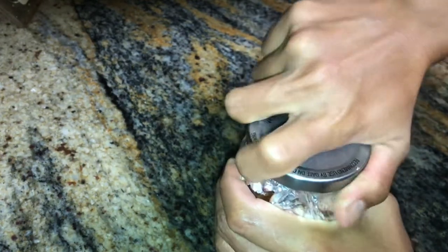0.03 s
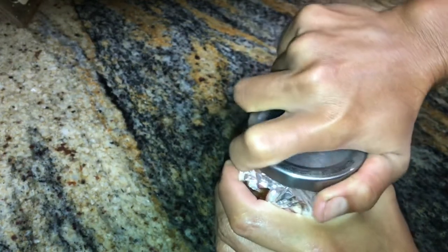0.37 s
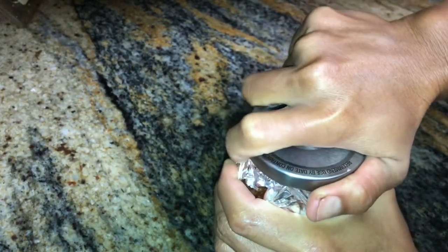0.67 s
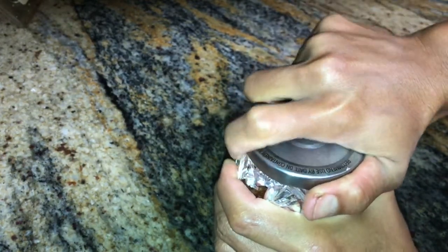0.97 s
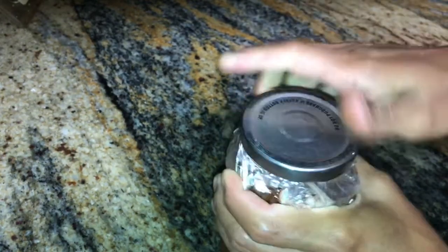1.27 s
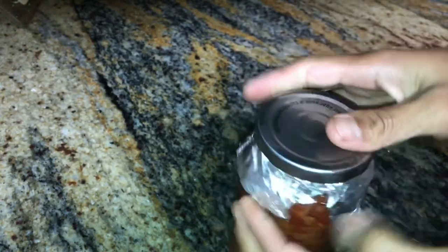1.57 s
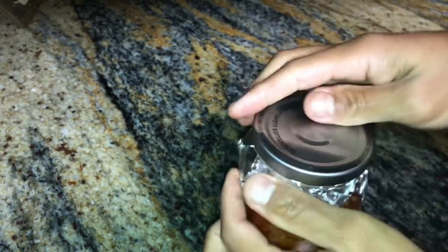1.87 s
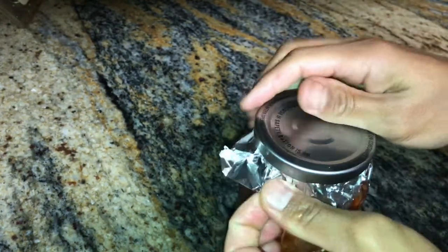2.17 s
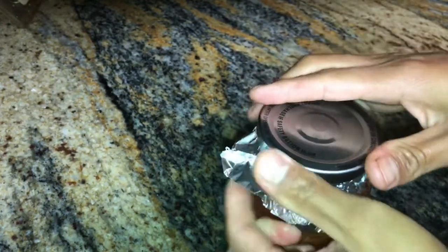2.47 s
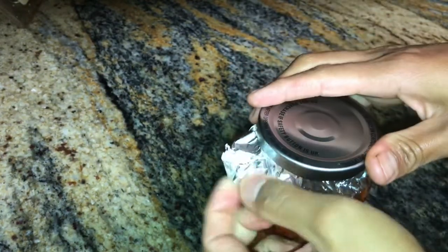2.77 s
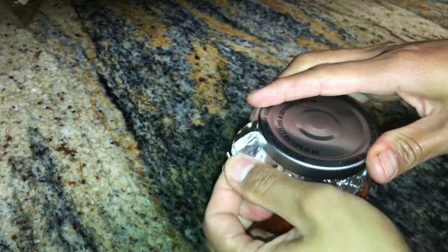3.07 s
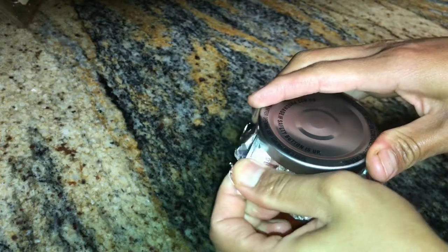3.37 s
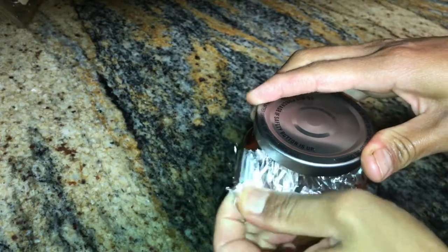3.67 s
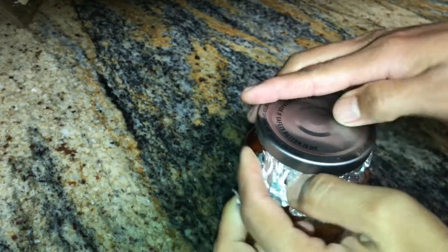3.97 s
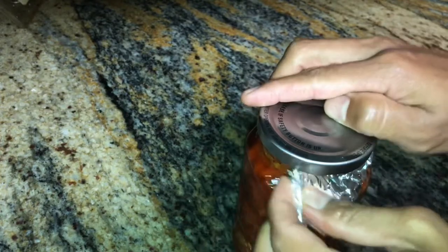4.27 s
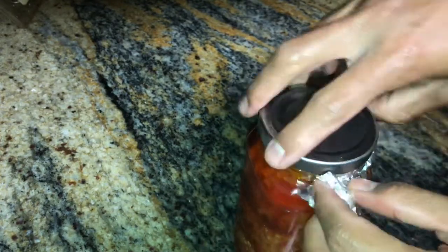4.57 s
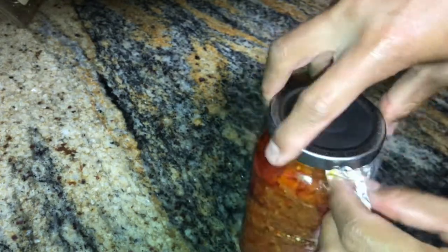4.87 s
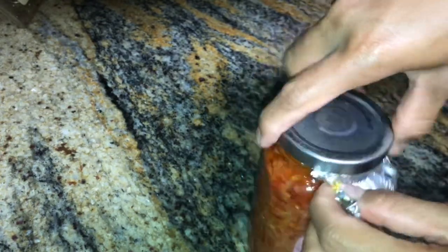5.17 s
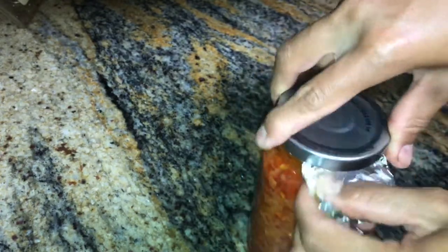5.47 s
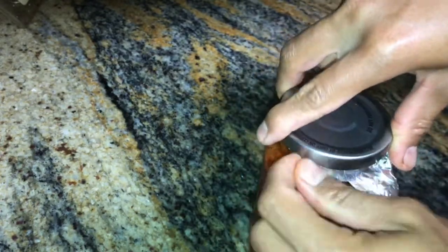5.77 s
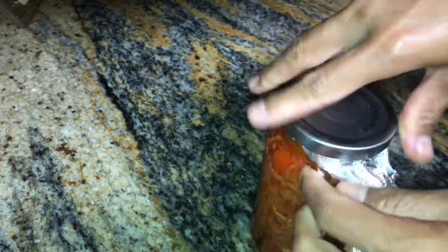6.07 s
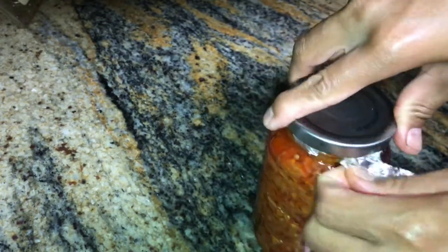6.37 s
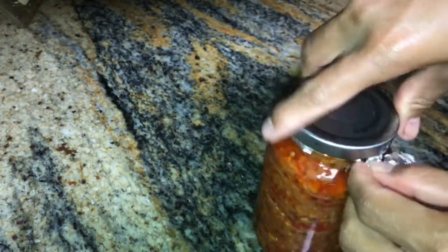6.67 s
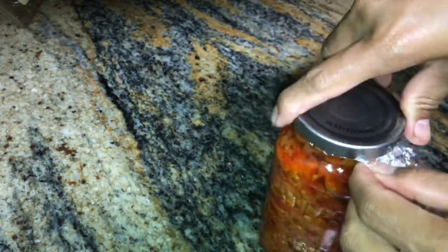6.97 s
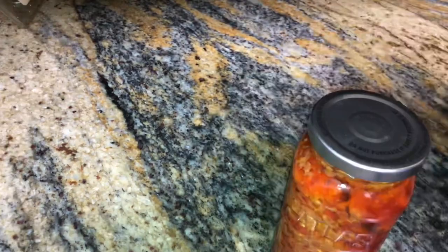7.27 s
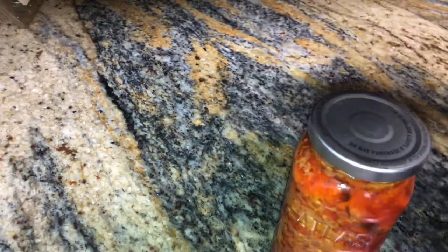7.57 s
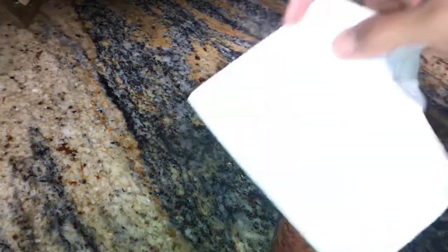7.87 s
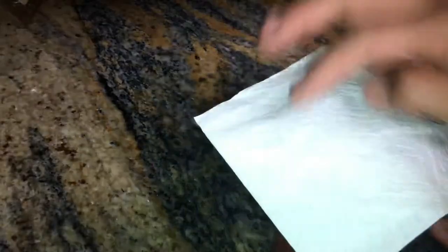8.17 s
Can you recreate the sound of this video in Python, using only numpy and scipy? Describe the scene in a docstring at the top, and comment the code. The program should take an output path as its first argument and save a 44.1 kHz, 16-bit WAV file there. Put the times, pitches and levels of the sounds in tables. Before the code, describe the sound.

For the first second, aluminium foil crackles lightly as a metal lid is twisted onto a full glass jar, with small ticks and a faint rumble of gripping hands. At about 1.2 seconds the jar knocks, then slides softly on a stone counter until nearly 2 seconds. Fingers pick at the foil, making bright, irregular crinkles and snaps that faintly ping the lid. These grow busier and are loudest from 3 to 3.5 seconds, with a few light knocks and scuffs. Around 4.3 seconds there is a very faint, brief low drone. From there until 7.2 seconds a foil strip is torn off in short crackling tugs, with a knock near 5.3 seconds and a tiny fingertip squeak near 7.1. A paper towel then rustles softly until about 8.4 seconds. Everything is quiet and close, over a low kitchen hum.

```python
"""A metal lid is screwed down over aluminium foil on a full glass jar, on a stone kitchen counter.
Fingers twist the lid and pick at the foil skirt: facets crackle, creases snap, the lid pings.
Knocks ring the jar; at 1.2 s it slides on the stone, and from 3 s it scuffs as the foil is pulled.
Between cuts at 4.3 and 7.2 s the room tone is thinner; the torn strip is tugged off along the rim,
a low drone sounds briefly and a fingertip squeaks off the lid. Then a paper towel is brought over."""
import sys
import numpy as np
from scipy import signal
from scipy.fft import rfft, irfft
from scipy.io import wavfile
from scipy.ndimage import uniform_filter1d

SR = 44100
rng = np.random.default_rng(int(sys.argv[2]) if len(sys.argv) > 2 else 0)


def wav_record(signal):
    """Record a signal, one row per channel, as 16-bit PCM in the file named by sys.argv[1]."""
    frames = np.transpose(np.atleast_2d(signal))
    bounded = np.clip(frames, -1, 1)
    # unit amplitude maps onto the largest positive 16-bit level
    quanta = np.round(bounded * 32767).astype(np.int16)
    wavfile.write(sys.argv[1], SR, quanta)


N = 366912
TIME = np.arange(N) / SR
# between two cuts, the room tone is thinner and the foil snaps start more softly
CUT_IN_S, CUT_OUT_S = 4.29, 7.21


def from_db(db):
    """Decibels to gain."""
    return 10 ** (np.asarray(db) / 20)


def rms_one(x):
    """Scale to rms 1."""
    return x / np.sqrt(np.mean(x ** 2) + 1e-20)


def band(x, low_hz, high_hz, order=2):
    """Causal band-pass."""
    sos = signal.butter(order, [low_hz, min(high_hz, .45 * SR)], "band", fs=SR, output="sos")
    return signal.sosfilt(sos, x + 1e-18)


def colour(x, spectrum):
    """Minimum-phase filter through (Hz, dB) points, so nothing sounds early."""
    hz, db = np.transpose(spectrum)
    bins_hz = np.fft.rfftfreq(N, 1 / SR)
    gain = from_db(np.interp(np.log(bins_hz + 1), np.log(hz), db))
    cepstrum = irfft(np.log(gain), N)
    fold = np.r_[1, 2 * np.ones(N // 2 - 1), np.zeros(N - N // 2)]
    return irfft(rfft(x) * np.exp(rfft(cepstrum * fold)), N)


def noise(spectrum):
    """Coloured noise of rms 1."""
    return rms_one(colour(rng.standard_normal(N), spectrum))


def drift(per_s):
    """Random line through per_s knots a second, rms 1."""
    knots_s = np.arange(0, TIME[-1] + 1, 1 / per_s)
    return rms_one(np.interp(TIME, knots_s, rng.standard_normal(N)[:len(knots_s)]))


def ring(x, hz, t60_s):
    """Decaying mode: a unit click rings a sine of height 1."""
    r, w = 1000 ** (-1 / (t60_s * SR)), 2 * np.pi * hz / SR
    return signal.lfilter([0, np.sin(w)], [1, -2 * r * np.cos(w), r * r], x + 1e-18)


def resonance(x, hz, width_hz):
    """Resonator with peak gain 1."""
    r, w = np.exp(-np.pi * width_hz / SR), 2 * np.pi * hz / SR
    return signal.lfilter(np.array([1, 0, -1]) * (1 - r * r) / 2, [1, -2 * r * np.cos(w), r * r], x + 1e-18)


def wavering_tone(hz, waver, per_s):
    """Sine of rms 1; its pitch wanders by the fraction waver."""
    pitch_hz = hz * (1 + waver * drift(per_s))
    return np.sqrt(2) * np.sin(2 * np.pi * np.cumsum(pitch_hz) / SR)


def strokes(rows, attack_s, release_s):
    """Gain of moves (start s, length s, dB) that swell, hold and fade; overlaps add in power."""
    start_s, length_s, db = np.transpose(rows)[:3, :, None]
    t = TIME[::40]
    fade = np.exp(np.minimum(t - start_s, 0) / attack_s - np.maximum(t - start_s - length_s, 0) / release_s)
    return np.interp(TIME, t, np.linalg.norm(from_db(db) * fade, axis=0))


def room_tone(full_db=-58.5, thin_db=-59, thin_hum_hz=245, thin_hum_db=-67):
    """Low noise and faint hum, thinner between the two cuts."""
    # Noise colours. Each row: frequency in Hz, relative density in dB.
    full_spectrum = [(15, -45), (25, 1), (134, -7), (175, -9.5), (405, -16), (489, -22.5), (796, -21),
                     (1230, -22.5), (2110, -31), (4140, -31), (4490, -42.5), (5880, -34.5), (6380, -30),
                     (7310, -39), (16000, -36.5)]
    thin_spectrum = [(40, -26), (60, -17), (80, 0.5), (160, 0.5), (240, -1.5), (330, -7.5), (500, -9),
                     (750, -14.5), (1200, -18.5), (2500, -22), (4000, -23), (16000, -32)]
    # Hum tones. Each row: frequency in Hz, level in dB.
    hums = [(73, -72), (121, -66.5)]
    full = from_db(full_db) * noise(full_spectrum)
    full += sum(from_db(db) * wavering_tone(hz, waver=.0198, per_s=20) for hz, db in hums)
    thin = from_db(thin_db) * noise(thin_spectrum)
    thin += from_db(thin_hum_db) * wavering_tone(thin_hum_hz, waver=.0198, per_s=20)
    thin_share = uniform_filter1d(1. * ((TIME > CUT_IN_S) & (TIME < CUT_OUT_S)), SR // 50)
    return (1 - thin_share) * full + thin_share * thin


def crackle(effort, base_per_s, clump_db, ring_db, hiss_db, spread_db=4.8, facet_count=30):
    """Tiny buckles come in avalanches, each ringing one facet; a harder pull merges them into hiss."""
    clumps = from_db(clump_db * drift(130))
    pull = np.clip(effort / from_db(-54), .5, 6)
    buckles = rng.random(N) < base_per_s * pull * clumps / SR
    sizes = from_db(spread_db * np.minimum(rng.exponential(1, N), 4))
    clicks = buckles * sizes * rng.choice([-1, 1], N)
    struck = rng.integers(0, facet_count, N)
    facets_hz = np.linspace(1700, 15500, facet_count)
    facets = sum(ring(clicks * (struck == k), hz, t60_s=.01) for k, hz in enumerate(facets_hz))
    hiss = rng.standard_normal(N) * clumps * pull
    grains = rms_one(clicks) + from_db(ring_db) * rms_one(facets) + from_db(hiss_db) * rms_one(hiss)
    return grains / np.sqrt(uniform_filter1d(grains ** 2, SR // 25) + 1e-9)   # levelled over 40 ms


def worked_foil(grains, spectrum, moves, attack_s, release_s, body_db, top_db, top_hz, wander_db=2):
    """Large facets give the crackle its body, small ones its top; each move has its own mix."""
    # Like-sized facets that come and go under the fingers. Each row: centre in Hz, width in Hz.
    facet_groups = [(3500, 900), (5600, 1300), (7800, 1500), (10000, 1800), (13200, 2500)]
    top_gain = strokes(moves, attack_s, release_s)
    body_moves = [(s, length_s, db + over_db) for s, length_s, db, over_db in moves]
    body_gain = strokes(body_moves, attack_s, release_s)
    sound = colour(grains, spectrum)
    for hz, width_hz in facet_groups:
        sound = sound + (from_db(wander_db * drift(12)) - 1) * resonance(sound, hz, width_hz)
    body = band(sound, 800, 6000, order=3)
    top = band(band(sound, 6000, 19000, order=3), 100, top_hz, order=1)
    return from_db(body_db) * body_gain * rms_one(body) + from_db(top_db) * top_gain * rms_one(top)


def foil_skirt(attack_s=.0081, release_s=.028):
    """Fingers press and pick at the whole skirt, which shakes the lid. Returns sound and effort."""
    # Each row: start in seconds, length in seconds, level in dB, body over top in dB.
    presses = [(0.004, 0.18, -55, -9), (0.282, 0.029, -57, 2.5), (0.438, 0.0056, -59.5, 3.5),
               (0.554, 0.017, -60, 3), (0.777, 0.044, -55, 0), (0.872, 0.032, -61.5, -1),
               (0.965, 0.12, -60, -5), (1.119, 0.057, -49, -8), (1.209, 0.11, -58, 0),
               (1.295, 0.034, -45, -1.5), (1.421, 0.0038, -47, -5.5), (1.7, 0.014, -58, 0),
               (1.794, 0.303, -47.5, -4.5), (2.155, 0.013, -50.5, -18), (2.241, 0.063, -43.5, -1),
               (2.335, 0.23, -56.5, 0), (2.43, 0.011, -51, -10), (2.594, 0.13, -49.5, -0.5),
               (2.66, 0.012, -43, -5), (2.878, 0.75, -54.5, 0.5), (2.951, 0.046, -49.5, 1.5),
               (3.045, 0.014, -43, -3), (3.403, 0.066, -39, 1), (3.577, 0.08, -40.5, -1.5),
               (3.834, 0.51, -51.5, -2.5), (4.113, 0.11, -48, -2)]
    # Crackle colour. Each row: frequency in Hz, gain in dB.
    spectrum = [(290, -69), (500, -15), (586, -14.5), (988, -14.5), (1620, -23), (1980, -12), (3250, -15.5),
                (3810, -11.5), (4530, -14), (6700, -3), (7750, -4), (8960, 0), (10500, -1.5), (14500, 5.5),
                (16000, -22)]
    effort = strokes(presses, attack_s, release_s)
    grains = crackle(effort, base_per_s=600, clump_db=3.6, ring_db=0, hiss_db=-.5)
    foil = worked_foil(grains, spectrum, presses, attack_s, release_s, body_db=1.5, top_db=.5, top_hz=11000)
    return foil + lid_ring(foil, gain_db=3), effort


def lid_ring(foil, gain_db, uneven_db=0, detune=0):
    """Foil clamped under the rim pings the lid; the place of pull and the hand shift its modes."""
    # Each row: frequency in Hz, gain in dB, t60 in seconds.
    modes = [(2210, -13, .03), (2620, -10, .03), (3060, -4, .04), (3430, 0, .055), (3720, -2, .04),
             (5270, -7, .035), (6850, -4, .04)]
    gains = from_db(gain_db + uneven_db * rng.standard_normal(len(modes)))
    shifts = 1 + detune * rng.standard_normal(len(modes))
    return sum(gain * from_db(db) * resonance(foil, hz * shift, np.log(1000) / (np.pi * t60_s))
               for gain, shift, (hz, db, t60_s) in zip(gains, shifts, modes))


def snap(t, rise_s, crack_s, facet_s, facet_db, lid_db, count=30, flip_db=-7):
    """One crack: the flipping facet gives it a pitch, its neighbours ring faintly, the lid pings."""
    after_s = np.maximum(t, 0)
    crack = rng.standard_normal(len(t)) * np.exp(np.minimum(t, 0) / rise_s - after_s / crack_s)
    hz = rng.uniform(3000, 15500, (count, 1))
    life_s = facet_s * rng.uniform(.5, 1.5, (count, 1))
    facets = rng.choice([-1, 1], (count, 1)) * np.sin(2 * np.pi * hz * after_s) * np.exp(-after_s / life_s)
    flip = facets[:3].sum(axis=0) * np.exp(-after_s / (2 * crack_s))   # the strongest modes die first
    sound = crack + from_db(flip_db) * flip + from_db(facet_db) * facets.sum(axis=0) * np.sqrt(2 / count)
    return sound + lid_ring(sound, lid_db, uneven_db=2, detune=.025)


def snaps(rows, soft_db=-.5, sheet_db=-7, sheet_hz=(1760, 3160), middle_db=2.5, middle_sag=.65):
    """Taut creases flip at once; between the two cuts the snaps start more softly."""
    # Body, middle and top of a snap. Each row: low edge in Hz, high edge in Hz.
    bands = [(2350, 4200), (4900, 9000), (9000, 16800)]
    lead, out = SR // 200, np.zeros(N + SR)
    t = np.arange(-lead, SR // 20) / SR
    for s, level_db, tilt_db in rows:
        if CUT_IN_S < s < CUT_OUT_S:
            sound = snap(t, rise_s=.0016, crack_s=.0019, facet_s=.003, facet_db=-13, lid_db=-20)
            level_db += soft_db
        else:
            ping_db = np.clip(-2 * tilt_db, -8, 6)   # deep snaps lie near the rim and shake the lid most
            sound = snap(t, rise_s=.00008, crack_s=.00044, facet_s=.0026, facet_db=-16, lid_db=ping_db)
        # body, middle, top, then the sheet flexing around the crease
        offsets_db = [-tilt_db, middle_db + middle_sag * min(tilt_db, 0), tilt_db, sheet_db - tilt_db]
        at = round(s * SR) - lead
        for (low_hz, high_hz), db in zip(bands + [sheet_hz], offsets_db):
            part = band(sound, low_hz, high_hz, order=3)
            out[at:at + len(t)] += from_db(level_db + db) * part * np.sqrt(lead / np.sum(part ** 2))
    return out[:N]


def large_creases():
    """The main creases snap as the foil is picked and torn."""
    # Each row: time in seconds, level in dB, tilt in dB per octave.
    creases = [(0.0157, -48.5, 8), (0.0569, -47, 3), (0.0914, -46.5, -1.5), (0.1171, -47, 3),
               (0.1339, -45, 2), (0.1433, -44.5, 6.5), (0.148, -55, -1), (0.2841, -50, 7.5),
               (0.3082, -46.5, 1), (0.5543, -47, 7), (0.663, -56, 1), (0.8633, -45, 0), (0.9577, -45, -3),
               (0.9652, -44.5, -3.5), (1.0287, -48, 7), (1.0398, -46, 1.5), (1.3336, -39, -1),
               (1.3928, -50, 2), (1.5022, -52.5, 5), (1.6964, -44, 4.5), (1.7031, -42, 2.5),
               (1.7805, -45.5, 7), (1.8182, -55, 18), (1.865, -53, 18), (1.9142, -45, 10),
               (1.9521, -42.5, 7.5), (2.0001, -48.5, 17), (2.0432, -44, -3), (2.0634, -35.5, 4.5),
               (2.0855, -38.5, -2.5), (2.1669, -34.5, -6), (2.1839, -36.5, 5), (2.2499, -42.5, 6.5),
               (2.2896, -37, 5.5), (2.4344, -44, 6), (2.4782, -52, 5), (2.5023, -40.5, 6),
               (2.5401, -45.5, 4), (2.5742, -60, 20), (2.6323, -35.5, 1.5), (2.6626, -33.5, -1.5),
               (2.6672, -32.5, -1), (2.6761, -42, 10), (2.9157, -41, 1.5), (2.9848, -32.5, 1.5),
               (3.0078, -49, -6), (3.0248, -36.5, -1), (3.0291, -31.5, 0), (3.0481, -39, 5),
               (3.0613, -28.5, 2), (3.0877, -35, 4.5), (3.1247, -33, -4), (3.163, -38.5, -8),
               (3.1918, -36, 9.5), (3.2458, -43, -9.5), (3.2535, -40.5, 7.5), (3.279, -48, 3),
               (3.2937, -32.5, -3), (3.3158, -34, 4), (3.3349, -35.5, 3.5), (3.3848, -38.5, 2.5),
               (3.4028, -27, -7), (3.4099, -23, -6.5), (3.433, -23.5, -5), (3.438, -29.5, -3.5),
               (3.6048, -36.5, -4), (3.6132, -42, 3), (4.0368, -47, 4.5), (4.1389, -39, 1),
               (4.1867, -40, 1.5), (4.3427, -42, 7), (4.501, -52.5, 14.5), (4.8715, -40, 7.5),
               (4.9398, -60, 12), (5.4459, -42.5, 5), (5.5759, -40.5, 6), (5.928, -38, -0.5),
               (5.9348, -39.5, 3), (5.9819, -43.5, 9), (6.0349, -37.5, 5), (6.1029, -41, 3.5),
               (6.285, -49, 2), (6.4016, -42, 0.5), (6.5822, -42.5, 6), (6.671, -52.5, 15.5),
               (6.9492, -56.5, 4), (7.1148, -50, 5)]
    return snaps(creases)


def small_creases(effort, runs=42, per_run=3, gap_s=.017, above_db=1, spread_db=5, limit_db=-46.5):
    """Small creases give way at random and set off their neighbours; strength follows the effort."""
    starts_s = rng.uniform(.02, CUT_OUT_S, (runs, 1))
    times_s = (starts_s + gap_s * rng.exponential(1, (runs, per_run)).cumsum(axis=1)).ravel()
    strength, dullness = rng.standard_normal((2, len(times_s)))
    effort_db = 20 * np.log10(np.interp(times_s, TIME, effort) + 1e-9)
    level_db = np.minimum(effort_db + above_db + spread_db * strength, limit_db)
    tilt_db = 3 - .5 * dullness
    return snaps(np.c_[times_s, level_db, tilt_db])


def grip_rumble():
    """The hands rumble at each twist of the lid."""
    # Each row: start in seconds, length in seconds, level in dB.
    twists = [(.24, 0.12, -55.5), (.48, .13, -54.5), (.79, 0.035, -50), (1.17, .05, -58)]
    # Each row: frequency in Hz, relative density in dB.
    spectrum = [(40, -36), (80, 11.5), (150, 8.5), (300, -0.5), (500, -14.5), (1000, -49)]
    return strokes(twists, attack_s=.1, release_s=.068) * noise(spectrum)


def knocks(tick_db=1):
    """A short push and a faint judder ring the jar; harder contacts are brighter and thinner."""
    # Contacts of hand, lid and jar. Each row: time in seconds, peak in dB, brightness in Hz.
    hits = [(0.305, -43, 1540), (.334, -49, 1210), (0.452, -38.5, 3900), (0.462, -47, 1990),
            (0.572, -39, 4000), (0.59, -45.5, 1490), (0.776, -41.5, 1230), (0.802, -43, 3020),
            (0.821, -44.5, 1960), (1.16, -26.5, 840), (1.167, -30.5, 830), (1.322, -33.5, 920),
            (1.334, -42, 1300), (2.016, -46.5, 1410), (2.086, -40, 3040), (2.291, -31.5, 3480),
            (3.410, -34.5, 3460), (3.60, -42, 4000), (5.267, -32, 2140), (5.272, -38, 2100)]
    # Full jar with lid. Each row: frequency in Hz, gain in dB, t60 in seconds.
    modes = [(191.7, -8, 0.049), (400, -2, 0.014), (505, -6.5, 0.051), (544, -10, 0.072), (794, -1, 0.018),
             (911, 3.5, 0.029), (1049, 5.5, 0.028), (1190, 4, 0.016), (1387, 0, 0.071), (1506, -4.5, 0.045),
             (1813, 1, 0.049), (2177, 10.5, 0.011), (2690, 2.5, 0.051)]
    t, out = np.arange(SR // 5) / SR, np.zeros(N + SR)
    judder = from_db(-13) * np.exp(-t / .0018) + from_db(-34) * np.exp(-t / .025)
    for s, peak_db, bright_hz in hits:
        push = band((t == 0) + judder * rng.standard_normal(len(t)), bright_hz / 7, bright_hz, order=3)
        body = sum(ring(push, hz, t60_s) * from_db(db + rng.standard_normal()) * (-1) ** k
                   for k, (hz, db, t60_s) in enumerate(modes))
        tick = from_db(tick_db) * np.clip(bright_hz / 4000, 0, 1) * push / np.abs(push).max()
        knock = body / np.abs(body).max() + tick
        at = round(s * SR)
        out[at:at + len(t)] += from_db(peak_db) * knock / np.abs(knock).max()
    return out[:N]


def jar_slide(rough_db=3):
    """Glass grinds softly over stone: a shove, then a longer draw."""
    # Each row: start in seconds, length in seconds, level in dB.
    moves = [(1.235, 0.019, -53.5), (1.36, 0.45, -60.5)]
    # Sliding jar. Each row: frequency in Hz, width in Hz, gain in dB.
    modes = [(516, 180, -12.5), (1024, 220, -8.5), (1230, 59, -6.5)]
    friction = rng.standard_normal(N) * from_db(rough_db * drift(110))
    body = sum(from_db(db) * resonance(friction, hz, width_hz) for hz, width_hz, db in modes)
    return strokes(moves, attack_s=.058, release_s=.095) * rms_one(band(body, 250, 1900))


def scuffs(rough_db=3):
    """Short swells of friction sound the hollow jar and grate in the lid."""
    # Each row: centre in seconds, half length in seconds, level in dB, grating over hollow in dB.
    rubs = [(3.033, 0.0041, -49, -12), (3.061, 0.0034, -42.5, -7), (3.864, 0.02, -61.5, 1),
            (4.648, 0.044, -59.5, 4), (5.033, 0.013, -57, -6), (5.131, 0.035, -66, 8),
            (5.285, 0.015, -52.5, 1.5), (6.666, 0.022, -63, 6), (6.725, 0.018, -55.5, 0),
            (7.108, 0.1, -69, 7.5)]
    # The hollow jar, then two lid resonances. Each row: frequency in Hz, width in Hz.
    modes = [(750, 200), (2050, 700), (2500, 600)]
    friction = rng.standard_normal(N) * from_db(rough_db * drift(200))
    hollow, *lid = [rms_one(resonance(resonance(friction, *mode), *mode)) for mode in modes]
    grating, out = rms_one(sum(lid)), np.zeros(N)
    for s, half_s, db, grate_db in rubs:
        swell = np.exp(-.5 * ((TIME - s) / half_s) ** 2)
        out += from_db(db) * swell * (hollow + from_db(grate_db) * grating)
    return out


def foil_strip(attack_s=.018, release_s=.026):
    """The torn strip is pulled off along the rim, tug by tug. Returns sound and effort."""
    # Each row: start in seconds, length in seconds, level in dB, body over top in dB.
    tugs = [(4.322, 0.014, -61, -24), (4.386, 0.053, -56.5, -7), (4.479, 0.077, -50.5, -10),
            (4.61, 0.11, -53, -9), (4.834, 0.1, -47, -7), (5, 0.16, -51, -5.5),
            (5.265, 0.0037, -48.5, -0.5), (5.322, 0.033, -56, -1.5), (5.438, 0.026, -38.5, -6.5),
            (5.494, 0.21, -47.5, -8.5), (5.814, 0.089, -49.5, -5.5), (5.915, 0.03, -42, -3.5),
            (6.03, 0.0064, -47, -4.5), (6.099, 0.14, -50, -6), (6.289, 0.036, -42.5, -8),
            (6.389, 0.022, -44, -9), (6.464, 0.25, -52, -7), (6.56, 0.031, -47, -22),
            (6.77, 0.036, -52, -1), (6.873, 0.027, -51, -8.5), (6.957, 0.017, -50.5, -6.5),
            (7.104, 0.017, -54, -2.5)]
    # Crackle colour. Each row: frequency in Hz, gain in dB.
    spectrum = [(290, -67), (500, 7.5), (640, -6), (795, -8), (1190, -9), (1770, -2.5), (2570, -2),
                (3250, -11.5), (4090, -2), (4660, -6.5), (6230, -7.5), (7640, 2), (9920, -7.5), (13400, 0),
                (16000, -10)]
    effort = strokes(tugs, attack_s, release_s)
    grains = crackle(effort, base_per_s=1100, clump_db=4, ring_db=.5, hiss_db=0)
    foil = worked_foil(grains, spectrum, tugs, attack_s, release_s, body_db=.5, top_db=2.5, top_hz=18900)
    return foil, effort


def drone(start_s=4.34, length_s=.12, level_db=-63):
    """A short low drone of narrow-band noise."""
    gain = strokes([(start_s, length_s, level_db)], attack_s=.04, release_s=.059)
    return gain * rms_one(resonance(rng.standard_normal(N), hz=310, width_hz=12))


def squeak():
    """A fingertip sticks and slips on the lid's lacquer at an unsteady pitch."""
    # Each row: start in seconds, length in seconds, level in dB.
    slips = [(7.125, .015, -62)]
    return strokes(slips, attack_s=.011, release_s=.037) * wavering_tone(hz=3040, waver=.0079, per_s=240)


def paper_towel(fibre_db=1.5, flutter_db=2.5):
    """Soft fibres catch and slip in a dense, dull rustle."""
    # Each row: start in seconds, length in seconds, level in dB.
    brushes = [(7.24, 0.415, -59.5), (7.24, 0.07, -58), (7.63, 0.028, -58.5), (7.77, 0.1, -62),
               (7.87, 0.021, -57), (8.225, 0.01, -49), (8.285, .035, -53.5)]
    # Each row: frequency in Hz, gain in dB.
    spectrum = [(290, -39.5), (500, -10), (1060, -9.5), (1600, -14), (1770, -9), (2850, -9.5), (4470, -11),
                (5090, -14.5), (5550, -14), (16000, -24)]
    fibres = rng.standard_normal(N) * from_db(fibre_db * drift(1500) + flutter_db * drift(60))
    return strokes(brushes, attack_s=.011, release_s=.024) * rms_one(colour(fibres, spectrum))


def kitchen(x, t60_s=.17, wet_db=-15, wall_hz=9000):
    """A short diffuse tail from the counter and the walls."""
    t = np.arange(SR // 2) / SR
    decay = from_db(-60 * t / t60_s) * (t > .003)
    tail = band(rng.standard_normal(len(t)), 200, wall_hz, order=1) * decay
    return x + from_db(wet_db) * signal.fftconvolve(x, tail / np.linalg.norm(tail))[:N]


def scene():
    """Foil, jar and paper in the kitchen, over the room tone."""
    skirt, press = foil_skirt()
    strip, pull = foil_strip()
    effort = press + from_db(-3.5) * pull   # the loose strip has weaker small snaps
    foil = skirt + large_creases() + small_creases(effort) + strip
    near = foil + knocks() + jar_slide() + scuffs() + squeak() + paper_towel()
    return (kitchen(near) + grip_rumble() + drone() + room_tone())[None]


def record(dry):
    """The deepest rumble and the top are cut."""
    low_cut = signal.butter(4, 36, "high", fs=SR, output="sos")
    high_cut = signal.ellip(10, .2, 80, 16000, fs=SR, output="sos")
    return signal.sosfilt(np.vstack([low_cut, high_cut]), dry)


dry = scene()
out = record(dry)
wav_record(out)
```